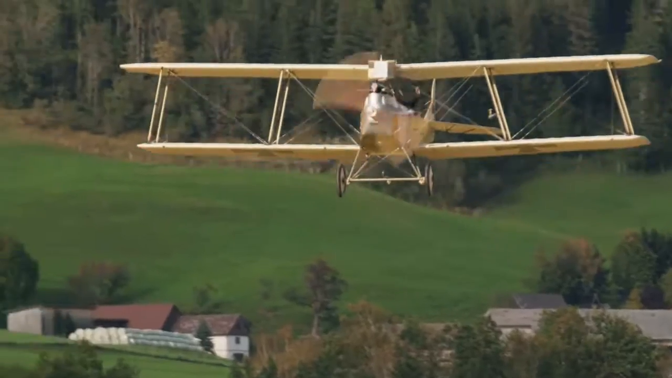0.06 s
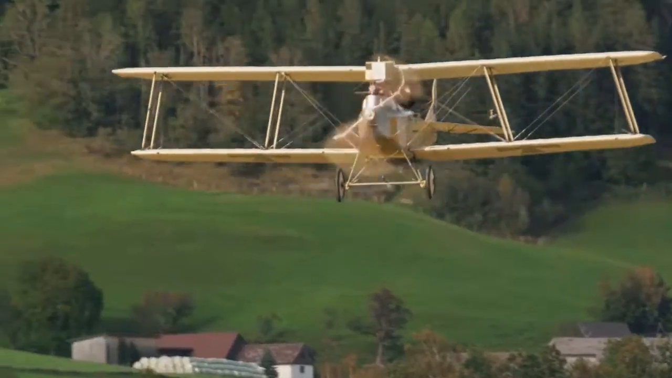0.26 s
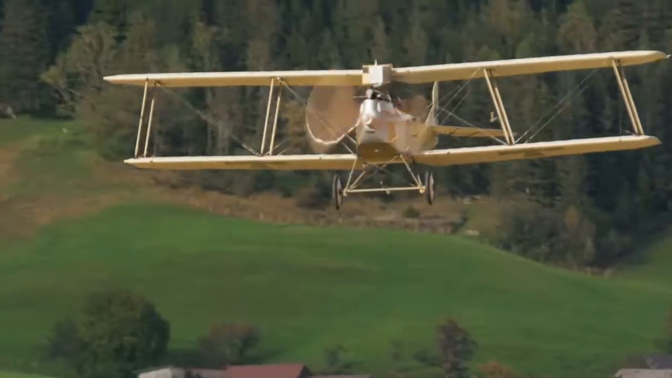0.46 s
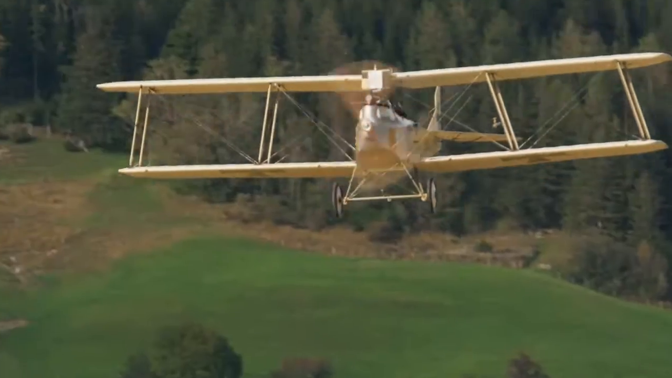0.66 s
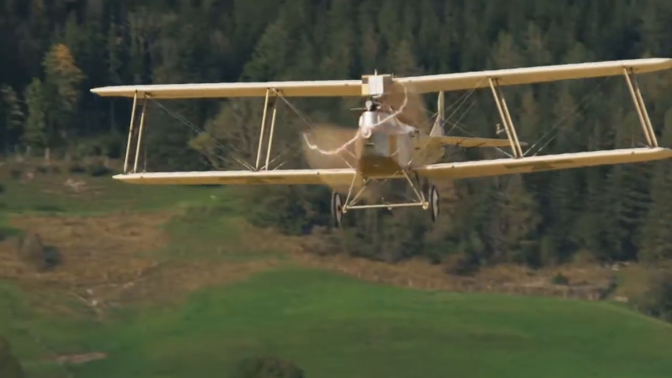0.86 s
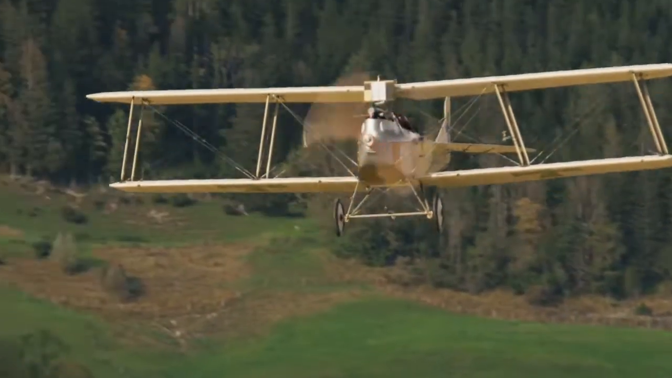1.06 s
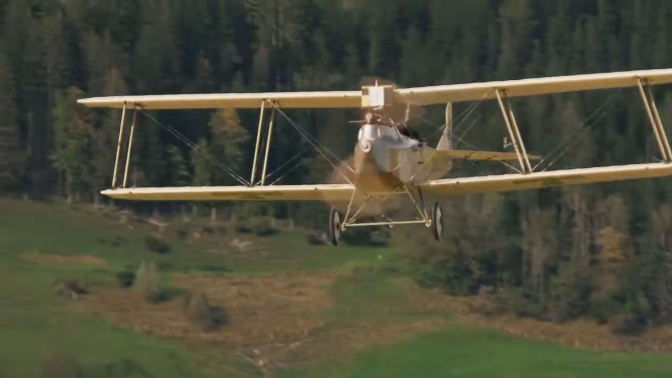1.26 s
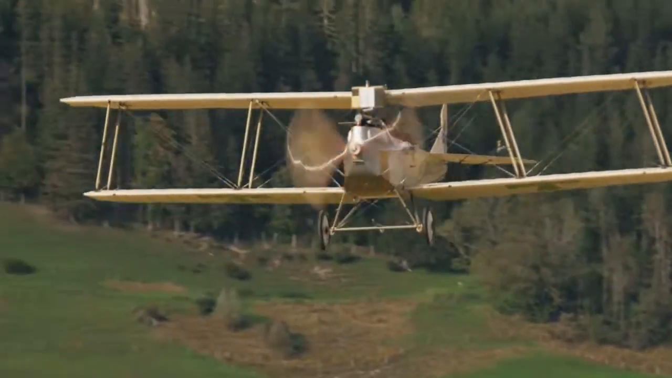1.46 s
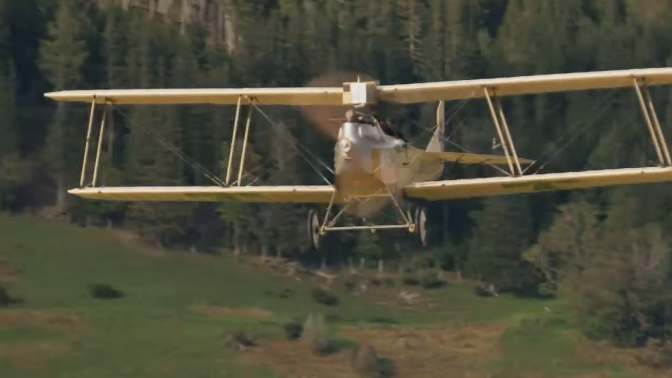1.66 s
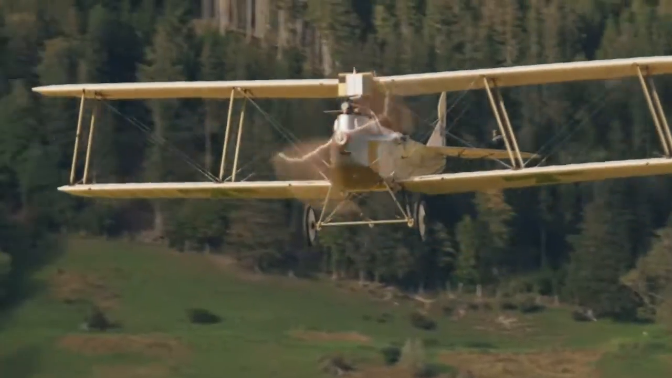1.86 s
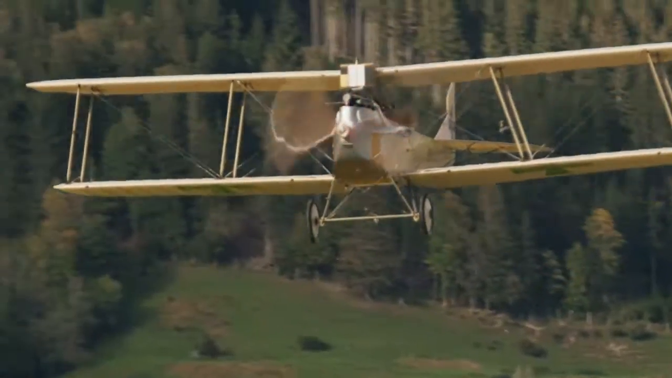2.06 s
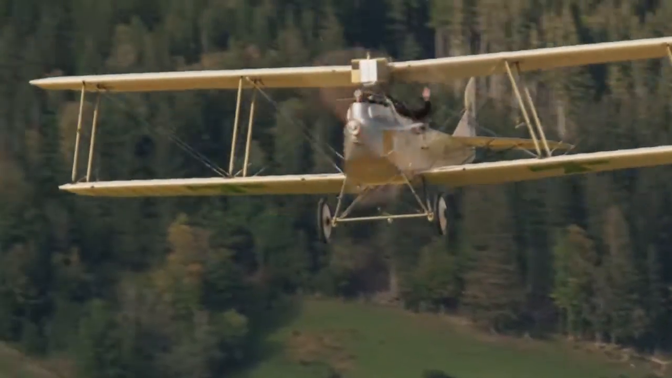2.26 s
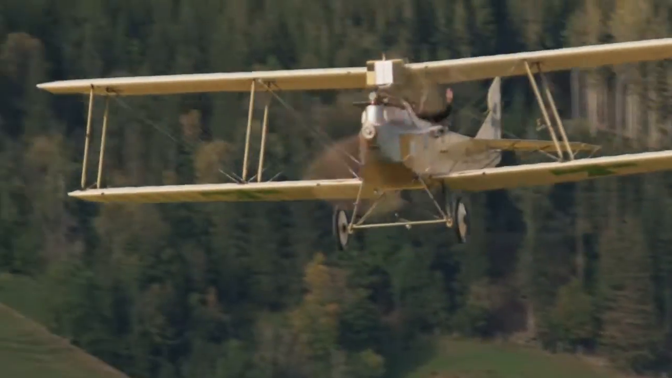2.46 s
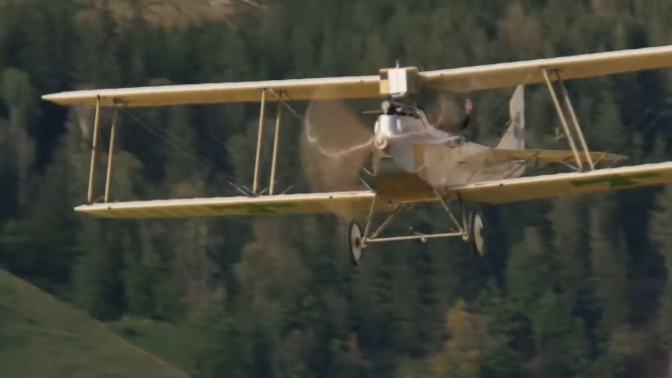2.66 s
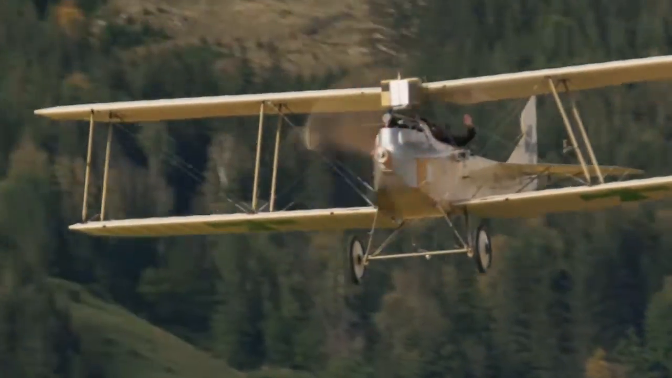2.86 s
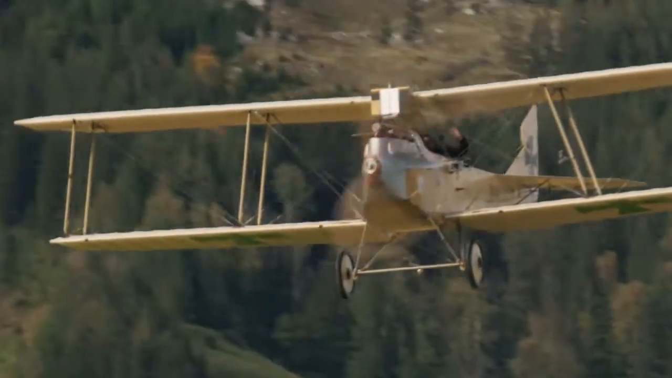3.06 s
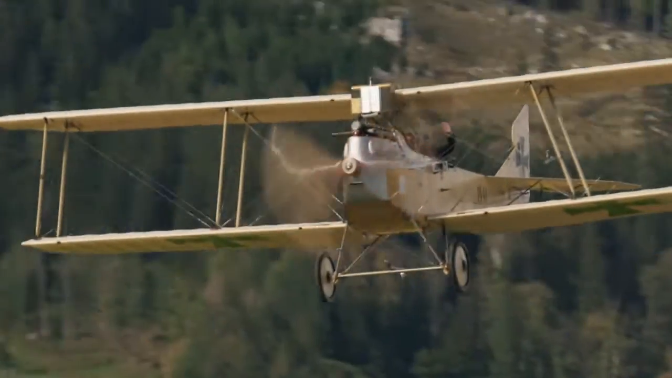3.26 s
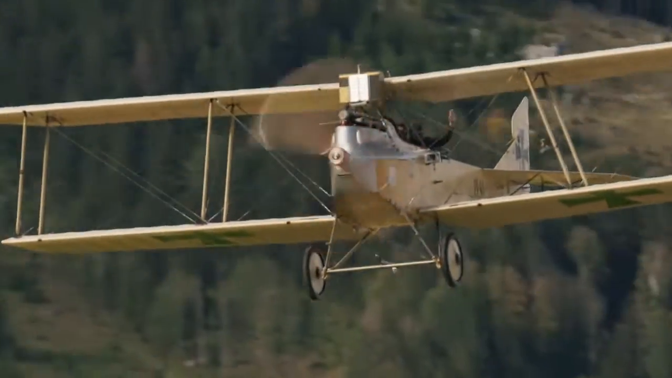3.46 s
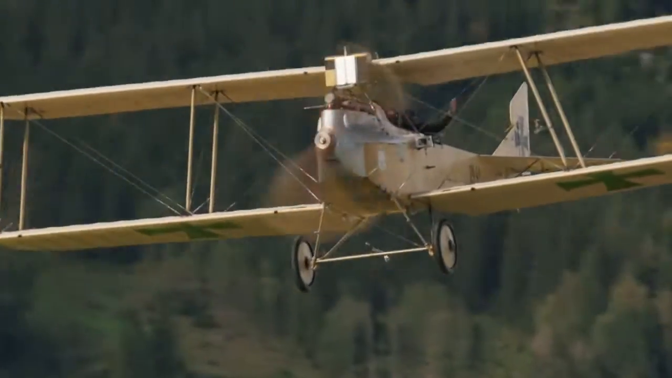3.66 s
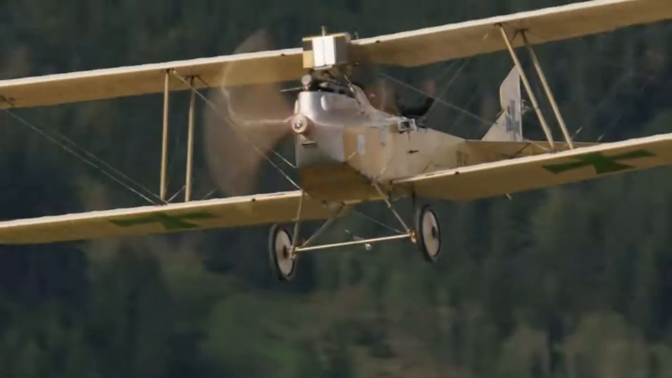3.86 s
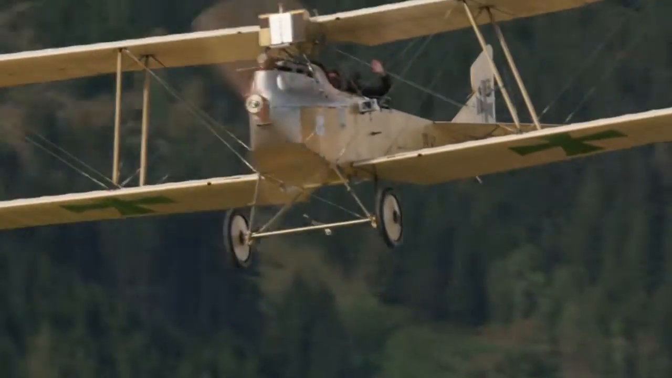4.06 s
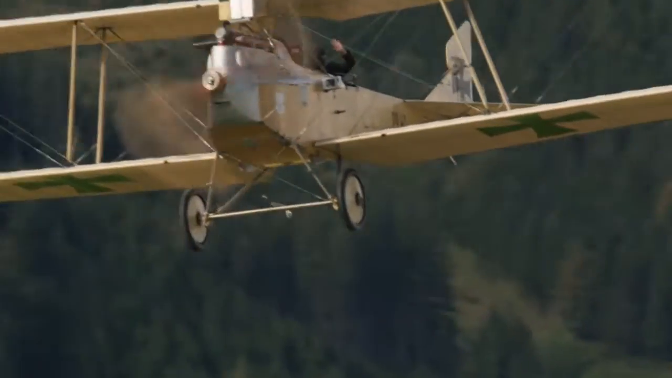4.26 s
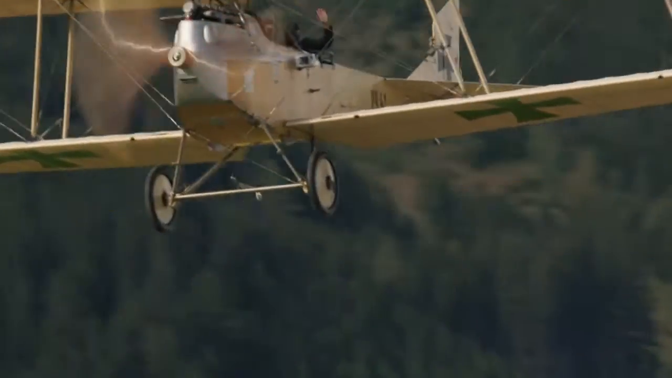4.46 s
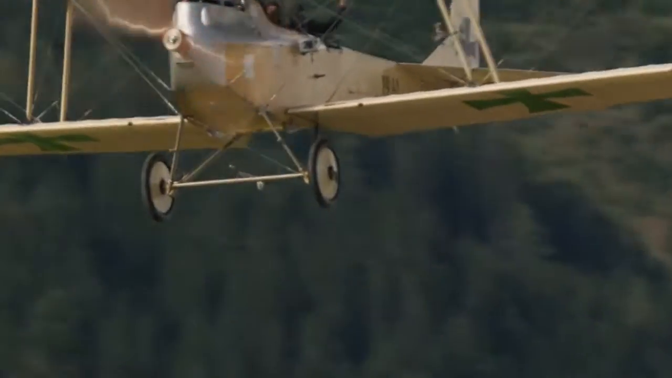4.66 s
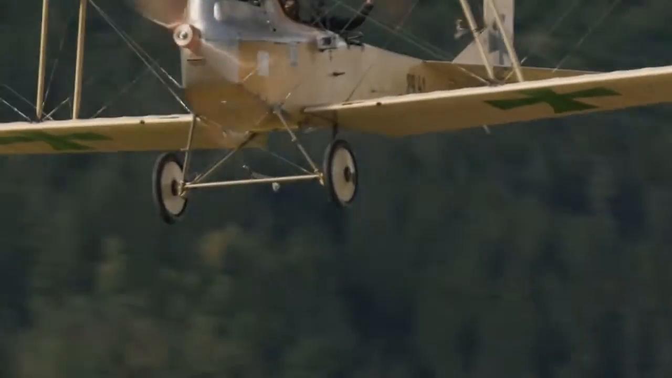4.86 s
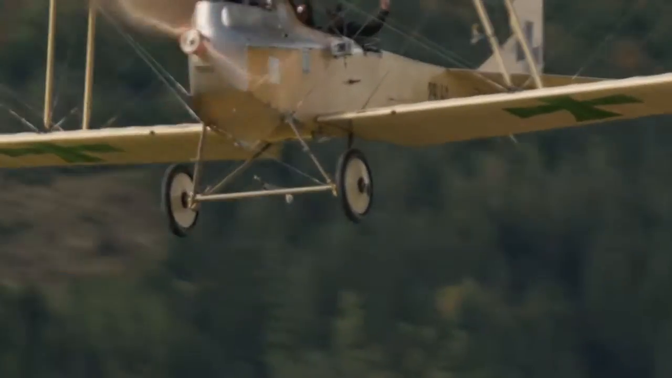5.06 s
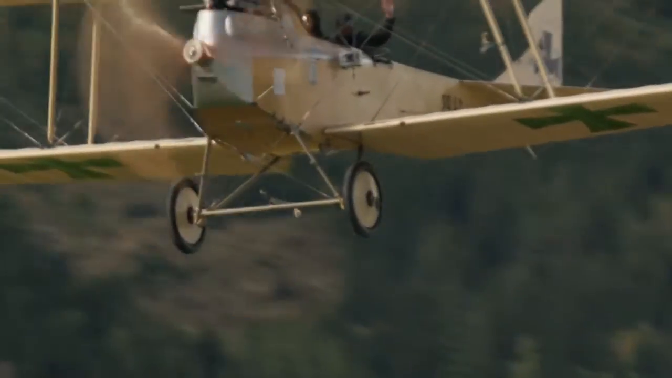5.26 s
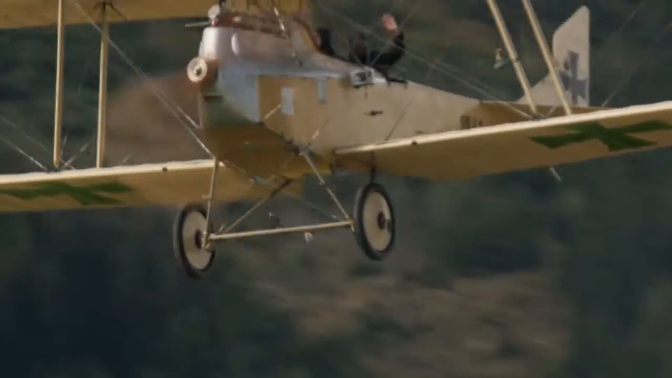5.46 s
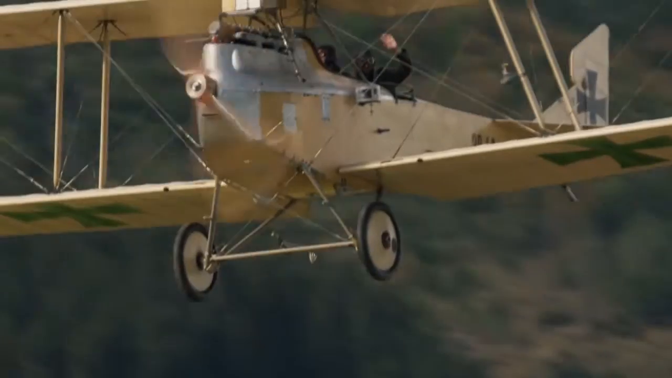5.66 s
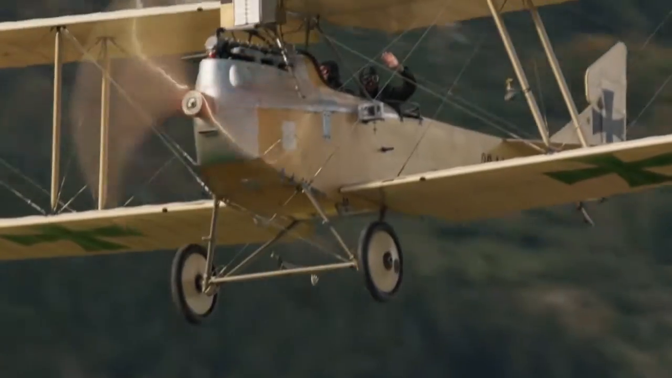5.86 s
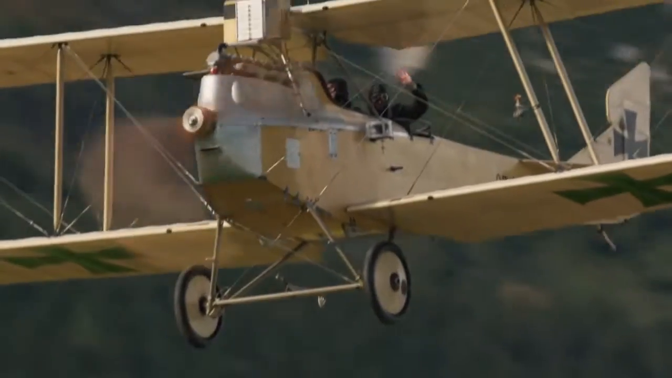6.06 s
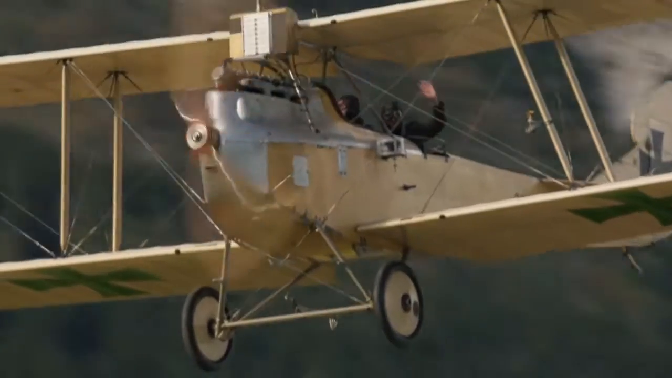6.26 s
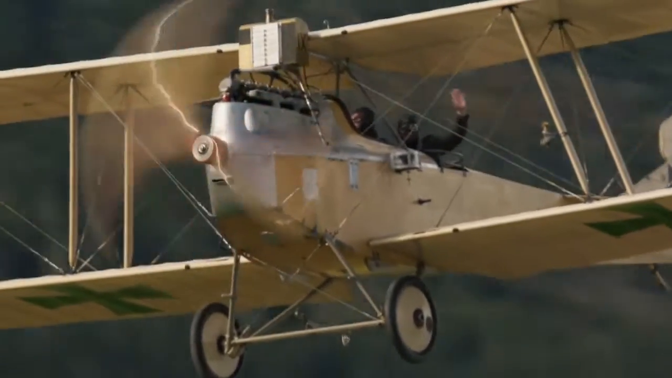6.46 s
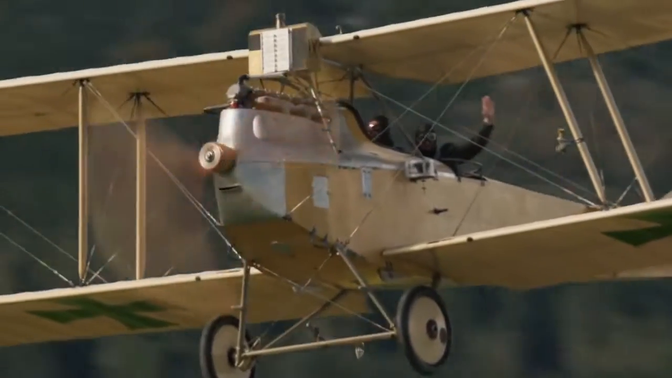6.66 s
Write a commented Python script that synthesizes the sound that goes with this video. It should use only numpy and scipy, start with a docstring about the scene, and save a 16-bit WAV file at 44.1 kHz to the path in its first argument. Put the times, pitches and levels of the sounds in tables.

```python
"""An old biplane with an in-line six and open exhaust stubs flies towards a listener in a meadow.
First comes a far, dull drone: each cylinder's thump rings the exhaust pipes, over propeller wash.
As the drone grows, each firing also spits a crack of gas noise over jet hiss, its treble thinned by the air.
The hardest cracks fall near five seconds; then the gas noise eases while the drone keeps growing.
The ground echoes the gas noise, with a longer lag as the aircraft climbs in the sky."""
import sys
import numpy as np
from scipy import signal
from scipy.fft import rfft, irfft
from scipy.io import wavfile
from scipy.ndimage import uniform_filter1d

SR = 44100
rng = np.random.default_rng(int(sys.argv[2]) if len(sys.argv) > 2 else 0)


def boost_factor(decibels):
    """Convert a level in decibels to a linear amplitude factor."""
    exponent = np.asarray(decibels, float) / 20
    return 10 ** exponent


def dump(signal):
    """Clip the signal to [-1, 1] and save it as 16-bit WAV at the path in sys.argv[1]."""
    limited = np.clip(np.atleast_2d(signal).T, -1, 1)
    pcm = np.round(limited * 32767).astype(np.int16)
    wavfile.write(sys.argv[1], SR, pcm)


N = 296352
T = np.arange(N) / SR

# The six stubs at unequal distances. Each row: arrival of the thump as a share of the engine cycle,
# mean thump level in dB, mean crack level in dB, both relative.
EXHAUST_STUBS = [(0.097, -0.3, -7), (0.236, -1.2, -2.5), (0.413, 3.1, -7.5), (0.565, 0.0, 0),
                 (0.756, -0.9, -4), (0.919, 2.8, -5)]
# The aircraft drawing near. Each row: time in seconds, gain of the drone in dB.
DRONE_APPROACH = [(0, -22.5), (2.4, -20), (4.7, -16.5), (5.9, -15.5), (6.72, -13)]
# Ground bounce as the aircraft climbs. Each row: time in seconds, lag in ms, share of the direct sound.
GROUND_BOUNCE = [(0, 0.14, 0.059), (2, 0.16, 0.14), (3.4, .2, 0.14), (4, .45, 0.18), (5, 0.68, 0.22),
                 (6, 1, 0.2), (6.72, 1.3, 0.25)]
JET_HZ = 500 * 2 ** (np.arange(14) / 3)  # third-octave centres of the gas noise


def curve(table):
    """Columns of a table after its time column, one value per sample."""
    s, *columns = np.transpose(table)
    return [np.interp(T, s, column) for column in columns]


def level(x, db):
    """Set the rms level in dB."""
    return x * boost_factor(db) / np.sqrt(np.mean(x ** 2))


def band(x, lo_hz, hi_hz, order=3):
    """Butterworth band-pass."""
    return signal.sosfilt(signal.butter(order, [lo_hz, hi_hz], "band", fs=SR, output="sos"), x)


def both_ways(x, order, hz, kind):
    """Butterworth filter run forwards and backwards, so that it shifts no phase."""
    return signal.sosfiltfilt(signal.butter(order, hz, kind, fs=SR, output="sos"), x)


def third(x, hz, per_octave=3):
    """Smooth slice of the spectrum; neighbouring slices add up without gaps."""
    steps_off = per_octave * np.log2(np.fft.rfftfreq(N, 1 / SR) / hz + 1e-9)
    return irfft(rfft(x) * np.cos(np.pi / 2 * np.clip(steps_off, -1, 1)) ** 2, N)


def ring(x, modes):
    """Sum of two-pole resonances."""
    return sum(gain * signal.lfilter(*signal.iirpeak(hz, hz / width, SR), x) for hz, width, gain in modes)


def walk(rate):
    """Random levels held 1 / rate s and slewed twice; spread near 1."""
    k = int(SR / rate)
    held = np.repeat(rng.standard_normal(N // k + 1), k)
    return 1.3 * uniform_filter1d(uniform_filter1d(held, k), k)[:N]


def lobes(rows, steady_db):
    """Gain that swells round each moment, over a steady share."""
    return boost_factor(steady_db) + sum(boost_factor(db) * np.exp(-((T - s) / half) ** 2) for s, half, db in rows)


def pulses(at, size):
    """Clicks at fractional sample places, each shared between two samples."""
    out, whole = np.zeros(N + 2), np.floor(at).astype(int)
    np.add.at(out, whole, size * (1 - at + whole))
    np.add.at(out, whole + 1, size * (at - whole))
    return out[:N]


def firings(lag):
    """Sample place and cylinder of every firing, delayed by lag as a share of the cycle."""
    # Engine speed as heard. Each row: time in seconds, four-stroke cycles per second.
    cycle_rate = [(0.0, 11.989), (0.48, 11.834), (0.96, 11.856), (1.44, 11.931), (1.92, 11.903),
                  (2.4, 11.933), (2.88, 12.045), (3.36, 12.009), (3.84, 11.953), (4.32, 11.911),
                  (4.8, 11.926), (5.28, 11.869), (5.76, 11.711), (6.24, 11.676), (6.72, 11.593)]
    first_cycle = .044  # phase at the start, in cycles
    phase = first_cycle + np.cumsum(curve(cycle_rate)[0]) / SR
    due = (np.arange(90)[:, None] + np.array(EXHAUST_STUBS)[:, 0] + lag).ravel()
    heard = (due > phase[0]) & (due < phase[-1])
    return np.interp(due[heard], phase, np.arange(N)), np.arange(len(due))[heard] % 6


def faint_hiss():
    """Very faint broad noise under everything."""
    return level(band(rng.standard_normal(N), 200., 15000., order=1), -86.0)


def ground(x):
    """Direct sound plus its bounce off the grass, which swallows the treble."""
    lag_ms, share = curve(GROUND_BOUNCE)
    soft = both_ways(x, 1, 4000., "low")
    return x + share * np.interp(np.arange(N) - lag_ms * SR / 1000, np.arange(N), soft)


def propeller_wash():
    """Propeller wash: a deep noise rumble and a higher noise band."""
    rumble = level(band(rng.standard_normal(N), 39.0, 49.0, order=2), -35)
    return rumble + level(band(rng.standard_normal(N), 300., 450.0, order=2), -32)


def jet_bands():
    """Level of each band of gas noise: the air takes more from higher bands, less as the path shortens."""
    # Gas noise after its way through gusty air. Each row: time in seconds, level in dB,
    # treble change in dB at clear_hz, frequency in Hz that the air favours.
    gas_in_air = [(0, -45.5, -26.5, 1320), (.34, -44.5, -22.5, 1605), (.66, -46.5, -11.5, 2800),
                  (.97, -46, -21.5, 1500), (1.35, -41, -22, 942), (1.7, -44.5, -22, 1230),
                  (2.08, -45, -22, 1723), (2.42, -39, -20, 2270), (2.9, -39, -16.5, 2140),
                  (3.25, -40, -16.5, 1900), (3.55, -36, -20.5, 1266), (3.92, -37.5, -21.5, 1600),
                  (4.23, -38.5, -14, 2000), (4.41, -32, -24.5, 1107), (4.74, -31, -20.5, 962),
                  (5.1, -31.5, -19, 930), (5.4, -30.5, -19.5, 935), (5.65, -37, -13, 900),
                  (5.9, -38, -13.5, 777), (6.09, -38.5, -11.5, 850), (6.25, -41, -12.5, 810),
                  (6.55, -38.5, -9.5, 1603), (6.72, -41, -8.5, 683)]
    # Colour of the jet. Each row: frequency in Hz, relative level in dB per band.
    jet_colour = [(500, -16.5), (650, -12.5), (900, -6.5), (1400, -0.5), (2400, 2), (3500, -3.5),
                  (5000, -3), (6500, -9.5), (8000, -10), (11000, -20)]
    clear_hz, loss_power = 3594, 0.7
    gust_top_hz = 4600  # the loss above grows no further past this
    near_db_per_khz = 0.82  # per kHz past gust_top_hz, for each dB of approach
    favour_db, favour_octaves = 4, 0.45
    low_db_per_ms, low_hz = 14, 900  # a later bounce cancels less of the bands under low_hz
    (gas_db, lost_db, best_hz), near_db = curve(gas_in_air), curve(DRONE_APPROACH)[0]
    hz = JET_HZ[:, None]
    colour_hz, colour = np.transpose(jet_colour)
    colour_db = np.interp(np.log(hz), np.log(colour_hz), colour)
    air_db = lost_db * (np.minimum(hz, gust_top_hz) / clear_hz) ** loss_power
    air_db = air_db + near_db_per_khz * (near_db - near_db[-1]) * np.maximum(hz - gust_top_hz, 0) / 1000
    air_db = air_db + favour_db * np.exp(-(np.log2(hz / best_hz) / favour_octaves) ** 2)
    bounce_db = low_db_per_ms * curve(GROUND_BOUNCE)[0] / (1 + (hz / low_hz) ** 4)
    return gas_db + colour_db + air_db + bounce_db


def gas_bursts(at, burst_db, hiss_db, noise):
    """Noise opened by a short swell at each firing, over steady jet hiss."""
    t = np.arange(400) / SR
    swell = t / .00065 * np.exp(1 - t / .00065)
    early = np.maximum(at - 0.0013 * SR, 0)
    return (signal.fftconvolve(pulses(early, boost_factor(burst_db)), swell)[:N] + boost_factor(hiss_db)) * noise


def gas():
    """Each firing spits a burst of noise over jet hiss; the loudest bursts also ring the stub."""
    # Loudest cracks. Each row: time in seconds, relative peak level in dB, ring frequency in Hz,
    # treble in dB against the peak.
    loud_cracks = [(0.38, -18.5, 1520, -36.5), (0.462, -20, 2270, -27.5), (0.549, -20.5, 1830, -26.5),
                   (1.395, -23, 886, -26), (1.975, -23, 1260, -28), (2.315, -19, 2130, -27.5),
                   (2.735, -19, 1580, -17), (3.23, -24, 1800, -10.5), (3.482, -13.5, 1200, -32.5),
                   (3.647, -15, 1130, -25.5), (3.733, -23.5, 995, -25.5), (4.04, -18.5, 1350, -31.5),
                   (4.15, -14, 1900, -22.5), (4.208, -18, 1550, -14), (4.232, -16.5, 1500, -19.5),
                   (4.348, -17.5, 1310, -36), (4.373, -22, 758, -26), (4.514, -13.5, 1340, -42),
                   (4.57, -7, 1600, -30.5), (4.656, -9, 870, -25.5), (4.709, -9, 1030, -34.5),
                   (4.738, -13, 1330, -32), (4.853, -16, 1080, -23), (4.879, -13, 1110, -19),
                   (4.907, -7.5, 1080, -24), (4.99, -2.5, 1300, -45), (5.159, -12.5, 754, -18),
                   (5.214, -10.5, 900, -23), (5.242, -12.5, 870, -19.5), (5.269, -22, 930, -15.5),
                   (5.296, -13, 920, -17.5), (5.381, -17, 1040, -15.5), (5.467, -18, 1030, -26.5),
                   (5.582, -11, 860, -19), (5.641, -12.5, 2330, -20.5), (5.666, -8, 1320, -22.5),
                   (5.748, -15.5, 740, -14), (5.939, -18.5, 830, -33), (6.007, -14, 872, -18),
                   (6.04, -16, 1060, -19.5), (6.064, -13, 775, -19), (6.094, -13.5, 985, -9.5),
                   (6.261, -18, 740, -26.5), (6.319, -15.5, 720, -25.5), (6.348, -16.5, 710, -14),
                   (6.496, -19, 724, -13.5), (6.519, -15, 1570, -14), (6.581, -20, 826, -15.5)]
    crack_lag = .028  # share of the cycle by which the gas jet trails the thump
    gust_db, flicker_db = 1.8, 1.2  # spreads: gusts shared by neighbouring bands, single bands
    at, cylinder = firings(crack_lag)
    bands_db = jet_bands()
    chance = np.clip(rng.standard_normal((len(at), 2)), -3, .9)
    body_db = np.array(EXHAUST_STUBS)[cylinder, 2] + 3.5 * chance[:, 0]
    snap_db = body_db - 0.5 + 3.4 * chance[:, 1]
    bangs, t = np.zeros(N + 400), np.arange(400) / SR
    for s, peak_db, hz, sharp_db in loud_cracks:
        i = int(s * SR)
        nearest = np.argmin(abs(at - i))
        body_db[nearest] = peak_db - bands_db[:6, i].max() - 28
        snap_db[nearest] = peak_db + sharp_db - bands_db[9, i] - 17
        # the stub's ring dies within a few swings
        swell = (hz * t / 1.015 * np.exp(1 - hz * t / 0.93)) ** 2
        bangs[i:i + 400] += boost_factor(peak_db - 5.5) * np.sin(2 * np.pi * hz * t) * swell
    noise = rng.standard_normal(N)
    body = gas_bursts(at, body_db, -15.5, noise)
    snap = gas_bursts(at, snap_db, -13.5, noise)
    # every band swells with the gusts and flickers on its own
    out = bangs[:N]
    gusts = uniform_filter1d([walk(4) for _ in JET_HZ], size=3, axis=0)
    for hz, db, gust in zip(JET_HZ, bands_db, gusts):
        jet = third(body if hz < 1800 else snap, hz)
        out = out + level(jet, -0.4) * boost_factor(db + gust_db * gust + flicker_db * walk(12))
    return out


def pipe_tones(thumps):
    """Thumps ring the exhaust pipes; the higher tones beam, so they swell as the angle changes."""
    # Exhaust resonances. Each row: frequency in Hz, width in Hz, signed relative gain.
    pipe_modes = [(74.7, 38, -0.15), (109.9, 12, 0.192), (153.3, 31, -0.464), (155.3, 57, 0.556),
                  (175.1, 32, -0.202), (235.8, 12, -0.037), (280.0, 55, -0.021), (324.6, 12, -0.018)]
    # Beams of the higher tones. Each row: time in seconds, half length in seconds, gain in dB.
    upper_beams, upper_steady_db = [(3.6, 1.0, -27), (4.9, 0.78, -16.5), (6.2, 0.62, -23)], -24
    waver_db = 2.2
    # a thump is a soft push: little of it below the firing rate or above the pipe tones
    pipe = level(both_ways(ring(thumps, pipe_modes), 3, [48., 400.], "band"), -.2)
    upper = both_ways(pipe, 2, 230., "high")
    out = pipe - upper + level(upper, 0.24) * lobes(upper_beams, upper_steady_db)
    # the pipe tones waver apart in the moving air
    slices_hz = 30 * 2 ** (np.arange(26) / 6)
    return sum(third(out, hz, per_octave=6) * boost_factor(waver_db * walk(7)) for hz in slices_hz)


def narrow_tones(thumps):
    """Two narrow resonances that stand out only from some angles."""
    # Narrow resonances. Each row: frequency in Hz, width in Hz, gain before levelling.
    narrow_modes = [(381, 34, 1), (455, 34, 1)]
    # One list per resonance. Each row: time in seconds, half length in seconds, gain in dB.
    narrow_beams, narrow_steady_db = [
        [(1.8, 0.38, -31), (3.2, .8, -35), (4.4, 0.53, -25), (6.7, 0.23, -21.5)],
        [(2.0, 0.71, -42), (4.2, 0.26, -43), (6.2, .6, -27.5)],
    ], -49
    out = np.zeros(N)
    for mode, beams in zip(narrow_modes, narrow_beams):
        tone = band(ring(thumps, [mode]), 0.99 * mode[0], 1.01 * mode[0], order=1)
        out = out + level(tone, 0.086) * lobes(beams, narrow_steady_db) * boost_factor(3.5 * walk(30))
    return out


def drone():
    """Slightly uneven thumps ring the pipes over propeller wash, all growing as the aircraft nears."""
    at, cylinder = firings(0)
    chance = rng.standard_normal((len(at), 2))
    uneven_at = np.clip(at + .00015 * SR * chance[:, 0], 0, N - 1)
    thump_db = np.array(EXHAUST_STUBS)[cylinder, 1] + 2.2 * chance[:, 1]
    thumps = pulses(uneven_at, boost_factor(thump_db))
    near_db, = curve(DRONE_APPROACH)
    return boost_factor(near_db) * (pipe_tones(thumps) + narrow_tones(thumps) + propeller_wash())


def scene():
    """The long bass waves arrive in step both ways, so the bounce colours only the gas noise."""
    bass, treble = drone(), ground(gas())
    mid = bass + treble + faint_hiss()
    # unequal microphone ports: left a little fuller in the deep bass, right a little brighter
    deep = signal.sosfilt(signal.butter(1, 100., fs=SR, output="sos"), bass)
    bright = both_ways(treble, 1, [2300., 7000.], "band")
    # scattered late sound differs between them
    late = boost_factor(-43) * np.roll(bass, 700) + boost_factor(-30) * np.roll(treble, 500)
    side = boost_factor(-29) * deep - boost_factor(-22) * bright + late
    return np.array([mid + side, mid - side])


def roll_off(x):
    """The treble ends steeply here."""
    return signal.sosfilt(signal.butter(12, 15700, fs=SR, output="sos"), x)


def record(dry):
    """The camera's stereo sound of the finished mix."""
    return roll_off(dry)


dry = scene()
out = record(dry)
dump(out)
```